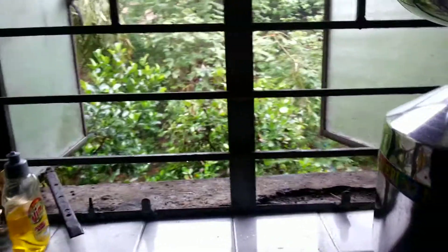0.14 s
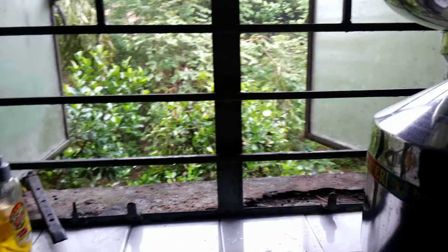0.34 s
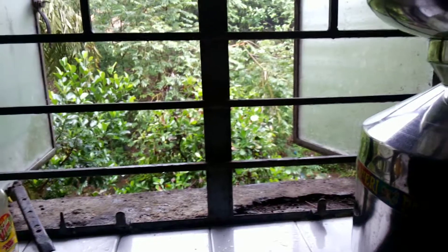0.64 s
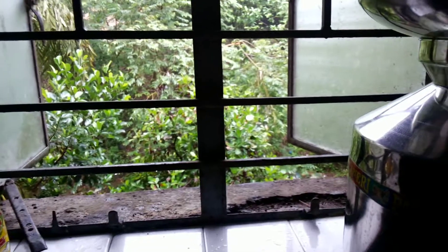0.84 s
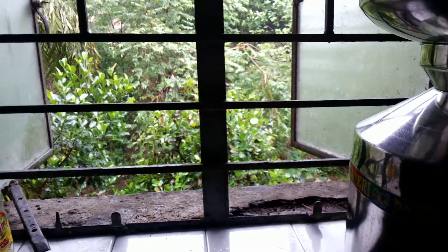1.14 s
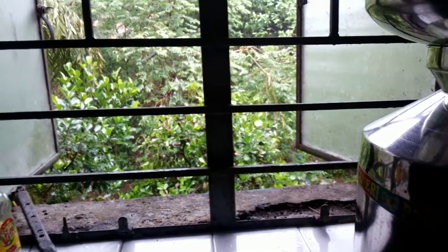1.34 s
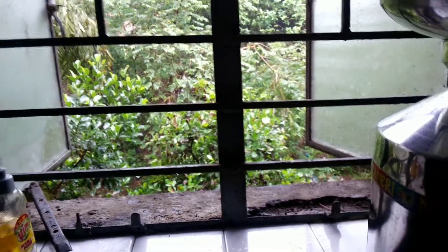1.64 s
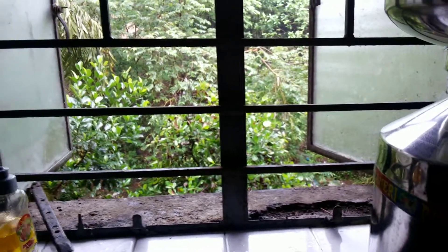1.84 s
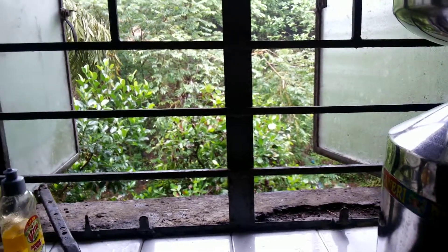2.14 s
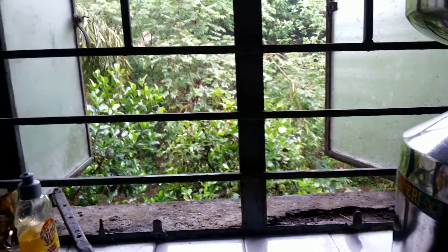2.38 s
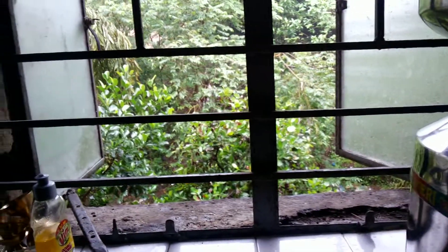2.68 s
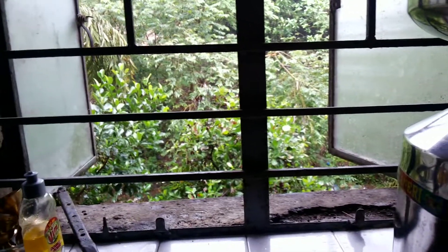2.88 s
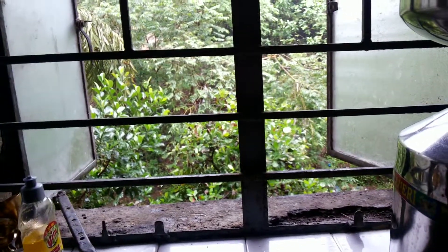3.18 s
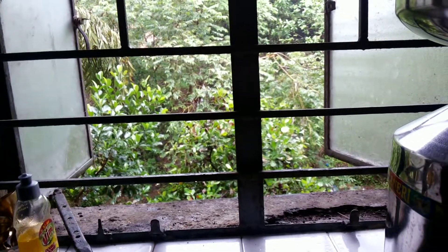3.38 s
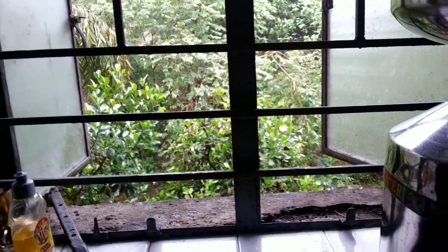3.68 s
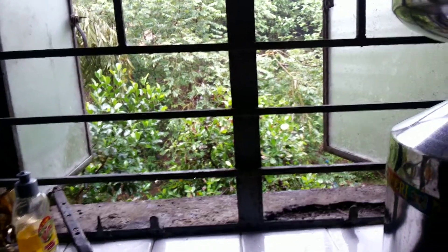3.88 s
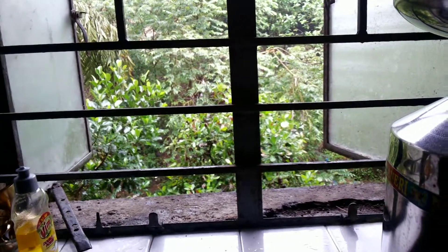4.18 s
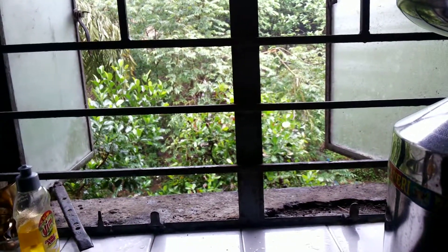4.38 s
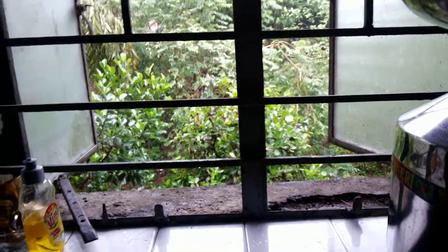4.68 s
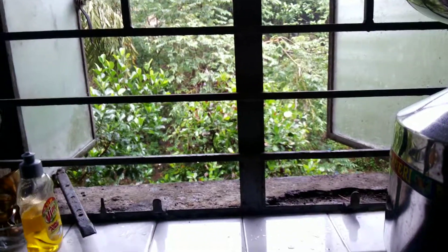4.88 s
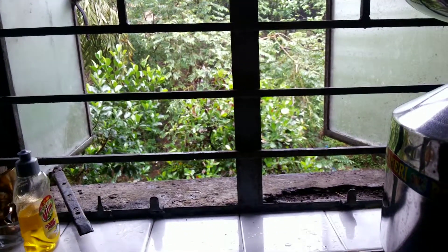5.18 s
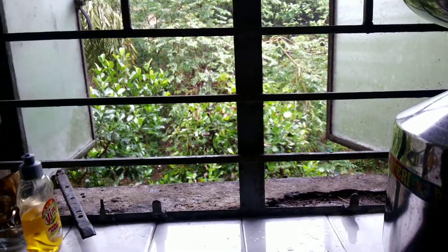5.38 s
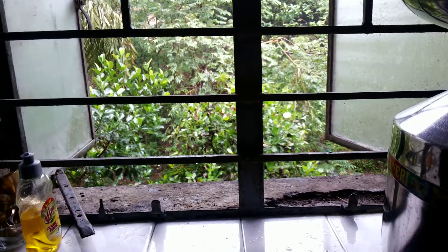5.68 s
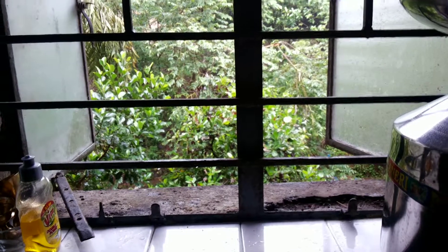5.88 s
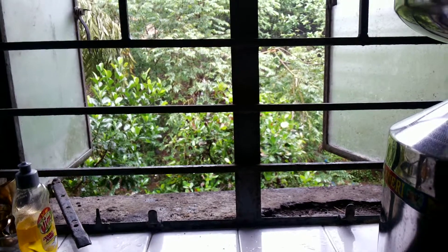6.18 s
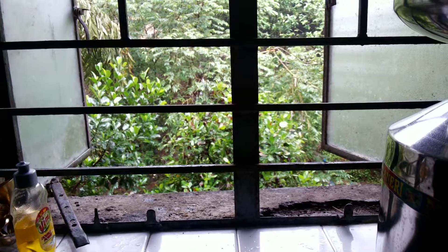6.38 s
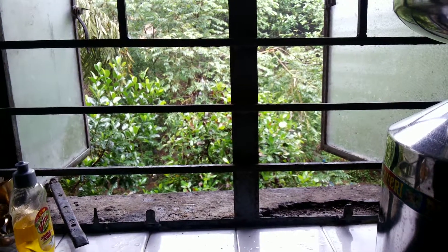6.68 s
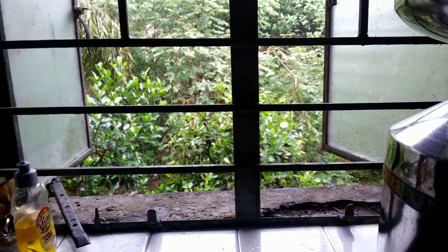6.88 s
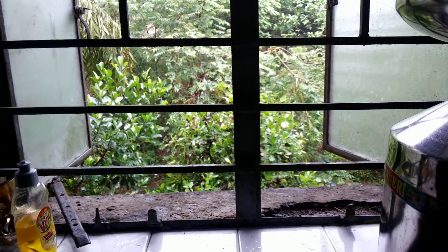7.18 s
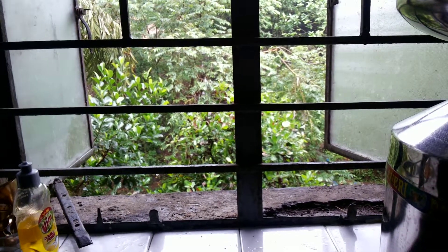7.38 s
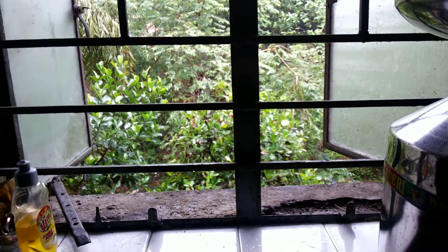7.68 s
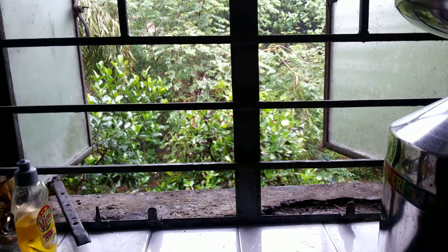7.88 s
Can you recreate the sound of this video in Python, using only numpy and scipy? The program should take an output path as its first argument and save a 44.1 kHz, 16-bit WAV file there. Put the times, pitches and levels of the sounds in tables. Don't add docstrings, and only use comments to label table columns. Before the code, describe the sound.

Handheld microphone at an open barred window: constant soft hiss and far machine hum, leaves rustling lightly. Squirrel chirps start sparse and moderate, peak in three strong whistled calls with abrupt upward breaks and falling tails, nearly overloading the microphone, then give way to weak squeals that climb in pitch. Breathy rasps surround the calls, short echoes return from window and yard, an insect whistles thinly, and a hand bumps the microphone.

```python
import sys
import numpy as np
from scipy import signal
from scipy.io import wavfile
from scipy.ndimage import uniform_filter1d

SR = 44100
rng = np.random.default_rng(int(sys.argv[2]) if len(sys.argv) > 2 else 0)


def generate_wav(signal):
    frames = np.transpose(np.atleast_2d(signal))
    scaled = np.clip(frames, -1, 1) * 32767
    pcm = np.round(scaled).astype(np.int16)
    wavfile.write(sys.argv[1], SR, pcm)


def decibels_to_gain(level_db):
    exponent = np.asarray(level_db, float) / 20
    return 10 ** exponent


N = 354563
BREAK_S = .005


def evened(x):
    return x / np.sqrt(np.mean(x ** 2) + 1e-20)


def read(points, hz):
    f, value = np.transpose(points)
    return np.interp(np.log(hz + 1), np.log(f + 1), value)


def add(mix, start_s, sound):
    part = mix[round(start_s * SR):][:len(sound)]
    part += sound[:len(part)]


def columns(rows):
    s, *values = np.transpose(rows)
    t = np.arange(s[0], s[-1], 1 / SR)
    return [s[0]] + [np.interp(t, s, v) for v in values]


def resonate(x, hz, width_hz):
    turn = np.exp(2j * np.pi * np.cumsum(hz * np.ones(len(x))) / SR)
    r = np.exp(-np.pi * width_hz / SR)
    low = signal.lfilter([1 - r], [1, -r], x / turn)
    low = signal.lfilter([1 - r], [1, -r], low)
    return 2 * (turn * low).real


def squirrel(rows, lowest_db, waver=.002, hoarse=.002):
    # frequency in Hz, throat gain in dB.
    throat = [(600, -3), (1200, -9.5), (2000, 0), (3600, -2), (5000, 4.5), (6500, -8.5), (8000, -11),
              (11000, -20.5), (15000, -3)]
    s, hz, effort_db, odd_db, tilt_db = columns(rows)
    wobble, grit = rng.standard_normal((2, N // 20))
    wobble = waver * evened(uniform_filter1d(wobble, size=120))[:len(hz)]
    grit = hoarse * evened(uniform_filter1d(grit, size=16))[:len(hz)]
    slide = np.minimum(abs(np.gradient(np.log(hz))) * SR, 15)
    turns = np.cumsum(hz * (1 + wobble + slide * grit)) / SR

    k = np.arange(1, 9)[:, None]
    odd = k % 2
    db = odd_db * odd + lowest_db * (k == 1) + tilt_db * np.maximum(np.log2(k / 2), 0)
    db = db + read(throat, k * hz)
    sounding = np.clip(1 - odd * (-odd_db - 26) / 8, 0, 1) * (k * hz < 13500)
    voice = (decibels_to_gain(db) * sounding * np.cos(2 * np.pi * k * turns)).sum(0)
    return s, np.sqrt(2) * decibels_to_gain(effort_db) * voice * signal.windows.tukey(len(hz), .08)


def odd_lines(t, lead_db):
    return np.interp(t, [0, BREAK_S], [lead_db, -42])


def short_chirp(s, lead_s, break_hz, db, slide_s, odd_db, tilt_db, aim_hz, fall_s):
    sag_hz_per_s, lead_tilt_db, peak_s = 3960, -12, .018
    t = np.arange(-lead_s, slide_s, 1 / 1000)
    slide_hz = aim_hz + (break_hz - aim_hz) * np.exp(-t / fall_s)
    hz = np.where(t < 0, break_hz - sag_hz_per_s * t, slide_hz)
    effort_db = db + np.interp(t, [-lead_s, peak_s, slide_s], [-13, 0, -20])
    tilt = np.where(t < 0, lead_tilt_db, tilt_db)
    return squirrel(np.c_[s + t, hz, effort_db, odd_lines(t, odd_db), tilt], lowest_db=-12.5)


def loud_chirp(s, hold_s, hold_hz, db, throb_db, before_s, swell_db, break_db, lift_db):
    lead_s, lead_hz, lead_db, lead_odd_db = .031, 2400, -42.5, 7.5
    settle_s, sag_hz, sag_s = .004, 22.1, 0.01396
    throb_hz = 27.1
    slide_s, fall_s, aim_hz, fade_db, tilt_db = .061, 0.0266, 620, -40, -25

    t = np.arange(-lead_s, hold_s + slide_s, 1 / 1000)
    held = np.clip(t, 0, hold_s)
    sliding = np.maximum(t - hold_s, 0)
    hz = hold_hz + (lead_hz - hold_hz) * np.exp(-(held / settle_s) ** 2 / 2)
    hz = hz + sag_hz * (held / sag_s) * np.exp(1 - held / sag_s)
    hz = aim_hz + (hz - aim_hz) * np.exp(-sliding / fall_s)

    throb = throb_db * np.cos(2 * np.pi * throb_hz * (t - hold_s + before_s)) * (t < hold_s)
    weakness = break_db * np.exp(-(held / settle_s / 2) ** 2)
    effort_db = db + swell_db * (1 - held / hold_s) + weakness + throb
    effort_db = effort_db + lift_db * (t > hold_s) + fade_db * (sliding / slide_s) ** 1.62
    effort_db = np.where(t < 0, lead_db, effort_db)
    hold_tilt_db = np.minimum(-41.5 - 1.6 * effort_db, 0)
    tilt = np.where((t > 2 * settle_s) & (t < hold_s), hold_tilt_db, tilt_db)
    odd_db = odd_lines(t + BREAK_S, lead_odd_db)
    return squirrel(np.c_[s + t, hz, effort_db, odd_db, tilt], lowest_db=-2.5)


def arched_chirp():
    # time in seconds, fold rate in Hz, effort in dB.
    arch = [(.468, 2058, -32), (.488, 2800, -29), (.511, 2480, -21), (.517, 1900, -28), (.525, 1560, -18),
            (.546, 1225, -23), (.575, 1228, -20), (.608, 1200, -30), (.645, 480, -37)]
    break_s, pure_s, pure_spread_s = .514, .56, 0.028
    s, hz, db = columns(arch)
    t = s + np.arange(len(hz)) / SR
    tilt_db = -15 - 27 * np.exp(-((t - pure_s) / pure_spread_s) ** 2)
    return squirrel(np.c_[t, hz, db, odd_lines(t - break_s, -15), tilt_db], lowest_db=4)


def quavering_squeal():
    # time in seconds, fold rate in Hz, effort in dB.
    quaver = [(5.21, 1284, -41), (5.23, 1403, -35.5), (5.25, 1384, -30), (5.268, 1340, -45),
              (5.285, 1306, -35), (5.318, 1413, -36.5), (5.335, 1467, -27), (5.42, 1636, -29.5),
              (5.45, 1656, -44)]
    s, hz, db = np.transpose(quaver)
    odd_db = np.interp(s, s[5:7], (2.5, -4))
    tilt_db = np.interp(s, s[5:8], (-11.5, -15, -35))
    return squirrel(np.c_[s, hz, db, odd_db, tilt_db], lowest_db=-7)


def rising_squeal(s, length_s, from_hz, to_hz, db, ease, drift_db, tilt_db):
    attack_s, release_s, edge_db = 0.023, .027, -19
    t = np.arange(0, length_s, 1 / 1000)
    u = np.minimum(t / (length_s - release_s), 1)
    climb = ease * u ** 2 * (3 - 2 * u) + (1 - ease) * u
    hz = from_hz + (to_hz - from_hz) * climb
    edges = np.maximum(1 - t / attack_s, 0) + np.maximum(1 - (length_s - t) / release_s, 0)
    effort_db = db + drift_db * u + edge_db * edges
    odd_db = -28.5 + 21.5 * climb
    return squirrel(np.c_[s + t, hz, effort_db, odd_db, tilt_db + 0 * t], lowest_db=10.5)


def puff(db, hz, width_hz, length_s):
    air = resonate(rng.standard_normal(N // 30), hz, width_hz)[:round(length_s * SR)]
    return decibels_to_gain(db) * evened(air) * signal.windows.tukey(len(air), .8)


def squirrel_calls():
    # voice break in seconds, lead-in in seconds, fold rate at the break in Hz, effort in dB,
    # slide in seconds.
    short = [(.435, .022, 1518, -29, 0.043), (1.834, .014, 1506, -27, 0.065),
             (2.635, .027, 1434, -26.5, 0.072)]
    # odd overtones in the lead-in in dB, tilt in dB per octave, slide aim in Hz,
    # slide time constant in seconds.
    short_colour = [(-10, -5, 900, .024), (-0.5, -11.5, 800, .022), (4.5, -10, 600, .035)]
    # voice break in seconds, hold in seconds, held fold rate in Hz, effort in dB, throb in dB.
    loud = [(3.039, .07, 1787, -14.5, 8), (3.483, 0.073, 1862, -15, 2.5), (3.939, .061, 1797, -8.5, 6)]
    # last throb before the slide in seconds, swell over the hold in dB, weakness at the break in dB,
    # slide lift in dB.
    loud_manner = [(.008, -1.5, -8, 4), (.009, -6, -1.5, 6), (.017, -2.5, -25, -1.5)]
    # start in seconds, length in seconds, from in Hz, to in Hz, effort in dB.
    rising = [(6.129, .23, 713, 1339, -34.5), (7.21, .245, 620, 1378, -40.5)]
    rising_ease = (.9, 0.205)
    rising_drift_db = (-8.5, 3.5)
    rising_tilt_db = (-20, -14)

    calls = [short_chirp(*row, *colour) for row, colour in zip(short, short_colour)]
    calls += [loud_chirp(*row, *manner) for row, manner in zip(loud, loud_manner)]
    calls += [arched_chirp(), quavering_squeal()]
    for row, *more in zip(rising, rising_ease, rising_drift_db, rising_tilt_db):
        calls.append(rising_squeal(*row, *more))
    for break_s, hold_s, *_ in loud:
        for start_s, db in ((break_s, -31), (break_s + hold_s, -33)):
            calls.append((start_s, puff(db, hz=4900, width_hz=1200, length_s=.03)))
    return calls


def echoes(decay):
    taps = np.zeros(SR)
    at = np.arange(40, SR - 12, 12)
    taps[at + rng.integers(0, 12, len(at))] = rng.choice([-1., 1.], len(at))
    hz, t, z = signal.stft(taps, SR, nperseg=256)
    fade = decibels_to_gain(-60 * t / read(decay, hz)[:, None])
    tail = signal.istft(z * fade, SR, nperseg=256)[1]
    return tail / np.linalg.norm(tail)


def surroundings(dry_calls):
    # frequency in Hz, time to fall 60 dB in seconds.
    bay = [(1000, 0.037), (8000, 0.065)]
    # frequency in Hz, time to fall 60 dB in seconds.
    yard = [(1000, 0.58), (2500, 0.46), (4000, 0.44), (7000, 0.43), (12000, 0.12)]
    direct_db, bay_db, yard_db = -5, -4.5, -1.5
    space = decibels_to_gain(bay_db) * echoes(bay) + decibels_to_gain(yard_db) * echoes(yard)
    return decibels_to_gain(direct_db) * dry_calls + signal.fftconvolve(dry_calls, space)[:N]


def insect_song(s, length_s, hz, db):
    attack_s, release_s, edge_db, sag_hz = 0.063, 0.39, -6.5, -130
    times = s + np.array([0, attack_s, length_s - release_s, length_s])
    pitch = hz + sag_hz * np.array([0, 0, 0, 1])
    level_db = db + edge_db * np.array([1, 0, 0, 1])
    s, pitch, level_db = columns(np.c_[times, pitch, level_db])
    whistle = resonate(rng.standard_normal(N // 7)[:len(pitch)], pitch, 70)
    return s, decibels_to_gain(level_db) * evened(whistle)


def bump(db, hz):
    t = np.arange(6000) / SR
    return decibels_to_gain(db) * np.sin(2 * np.pi * hz * t) * t * hz * np.exp(.6 - 0.64 * t * hz)


def noise(spectrum, patchy_db):
    frame_count, hz = N // 256 + 5, np.fft.rfftfreq(1024, 1 / SR)
    a, b, patches = rng.standard_normal((frame_count, 513, 3)).T
    patches = uniform_filter1d(patches, size=12, axis=0)
    patches = evened(uniform_filter1d(patches, size=14, axis=1))
    z = (a + 1j * b) * decibels_to_gain(read(spectrum, hz)[:, None] + patchy_db * patches)
    return evened(signal.istft(z, nperseg=1024, noverlap=768)[1][:N])


def background():
    # frequency in Hz, density in dB per Hz.
    hiss = [(12, -65), (20, -45.5), (101, -17.5), (150, -2), (241, -5.5), (270, 0.5), (434, -4),
            (472, -1.5), (527, -5), (802, -7.5), (2600, -7.5), (2990, -14), (3950, -12), (6180, -24.5),
            (16000, -27)]
    # frequency in Hz, density in dB per Hz.
    leaf_spectrum = [(600, -47), (1200, -22), (2500, -1), (4500, 4), (6000, -8), (9000, -28)]
    # time in seconds, leaf level in dB.
    breeze = [(0, -51.5), (.9, -53), (1.2, -51), (1.7, -52), (2.3, -53.5), (2.9, -51), (4.4, -52.5),
              (5, -54.5), (6, -54), (7, -54), (7.5, -51.5), (8.04, -53)]
    # frequency in Hz, width in Hz, level in dB.
    machine_tones = [(439, 8.2, -64.5), (543, 7.3, -61.5), (2660, 17, -67), (3848, 12, -62.5)]
    s, db = np.transpose(breeze)
    swell = decibels_to_gain(np.interp(np.arange(N) / SR, s, db))
    total = swell * noise(leaf_spectrum, patchy_db=0.45)
    for hz, width_hz, tone_db in machine_tones:
        total += decibels_to_gain(tone_db) * evened(resonate(rng.standard_normal(N), hz, width_hz))
    return total + decibels_to_gain(-50.5) * noise(hiss, patchy_db=-0.42)


def scene():
    # start in seconds, level in dB, centre in Hz, width in Hz,
    # length in seconds.
    puffs = [(1.419, -51, 1690, 600, 0.35), (1.597, -41, 3930, 900, .014), (2.01, -43.5, 2650, 2180, 0.046),
             (2.025, -50, 1060, 300, 0.026), (2.462, -41.5, 1970, 1210, 0.1),
             (2.472, -42.5, 4030, 1970, 0.059), (2.997, -34.5, 4870, 1000, 0.024),
             (3.441, -31, 4630, 1000, 0.014), (3.885, -33, 4700, 1000, 0.033),
             (3.12, -50, 7600, 590, 0.046), (3.569, -46.5, 7540, 700, 0.049),
             (4.006, -46.5, 7800, 600, 0.041), (7.207, -48.5, 2500, 300, 0.064),
             (7.449, -54.5, 1850, 700, 0.2), (7.53, -57, 4130, 400, .012)]
    # start in seconds, length in seconds, pitch in Hz, level in dB.
    insect_songs = [(0.981, 0.78, 6410, -63), (2.878, 1, 6420, -62.5), (5.132, 0.755, 6410, -59.5)]
    # start in seconds, level in dB, frequency in Hz.
    bumps = [(3.98, -63, 50), (4.25, -65, 60), (4.4, -63, 60), (4.448, -46.5, 200), (4.55, -61, 70),
             (4.85, -66, 70), (5.3, -65, 80), (5.92, -68, 60)]
    animal, near = np.zeros(N), background()
    for call in squirrel_calls():
        add(animal, *call)
    for s, *shape in puffs:
        add(animal, s, puff(*shape))
    for row in insect_songs:
        add(near, *insect_song(*row))
    for s, *shape in bumps:
        add(near, s, bump(*shape))
    return (surroundings(animal) + near)[None]


def low_pass(x):
    return signal.sosfilt(signal.butter(12, 16620, fs=SR, output="sos"), x)


def record(dry):
    grit_db, ceiling, edge_hz = -45, .735, 15720
    loudness = np.sqrt(abs(uniform_filter1d(dry ** 2, size=300)))
    gritty = dry + decibels_to_gain(grit_db) * loudness * rng.standard_normal(dry.shape)
    clipped = np.clip(gritty, -ceiling, ceiling)
    edge = signal.firwin(1023, edge_hz, window=("kaiser", 10), fs=SR)
    return low_pass(signal.oaconvolve(clipped, edge[None], "same"))


dry = scene()
out = record(dry)
generate_wav(out)
```